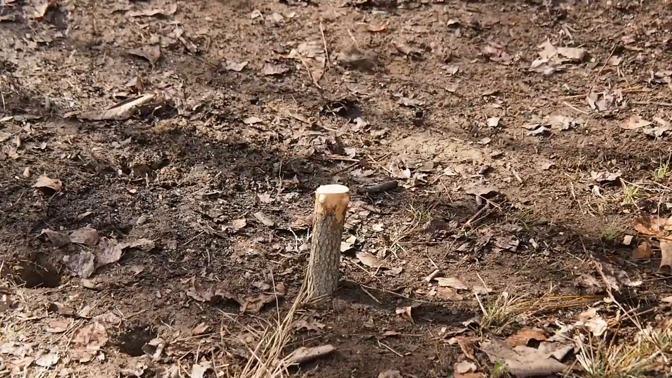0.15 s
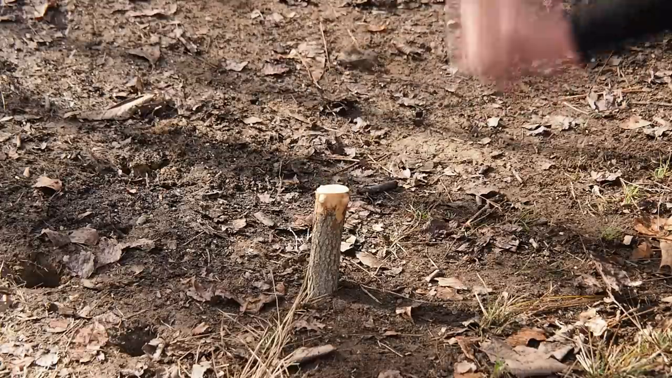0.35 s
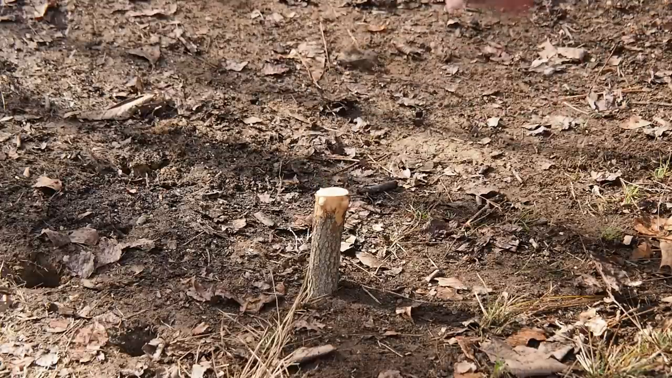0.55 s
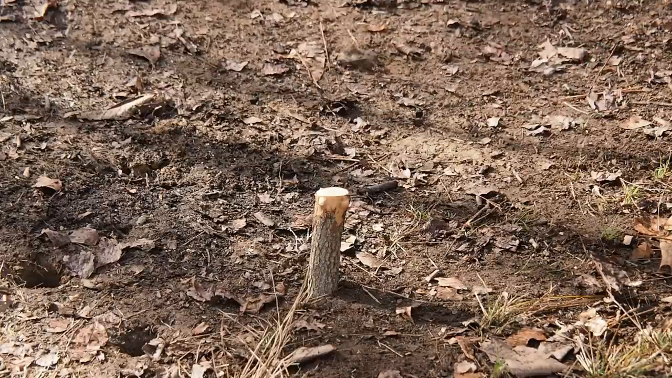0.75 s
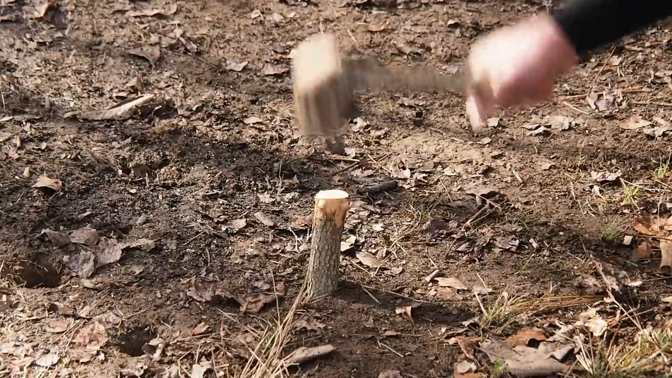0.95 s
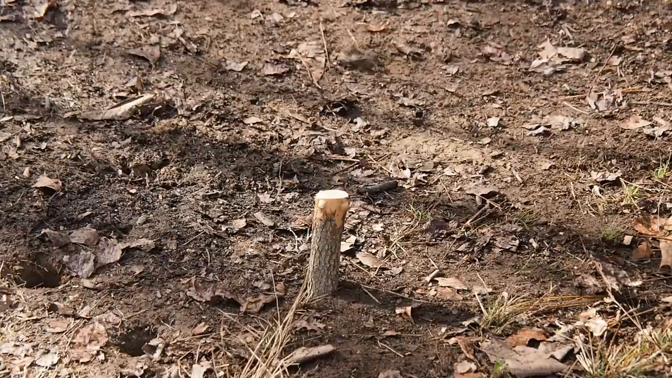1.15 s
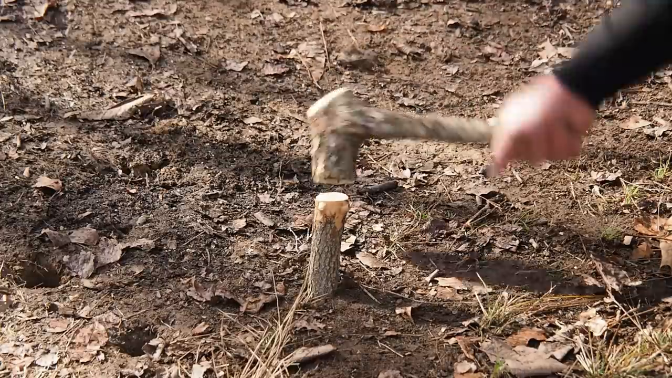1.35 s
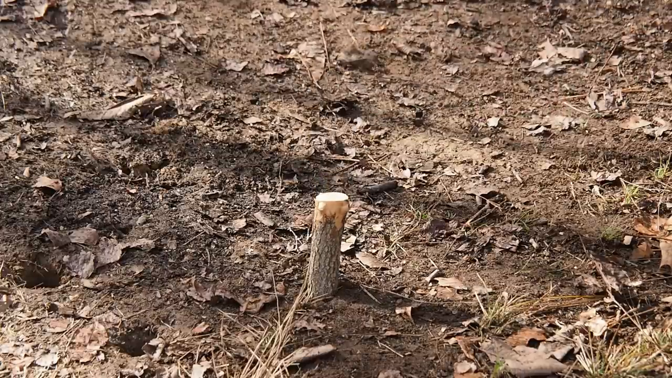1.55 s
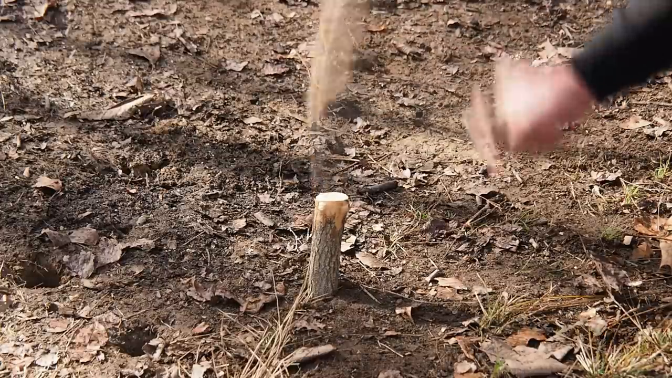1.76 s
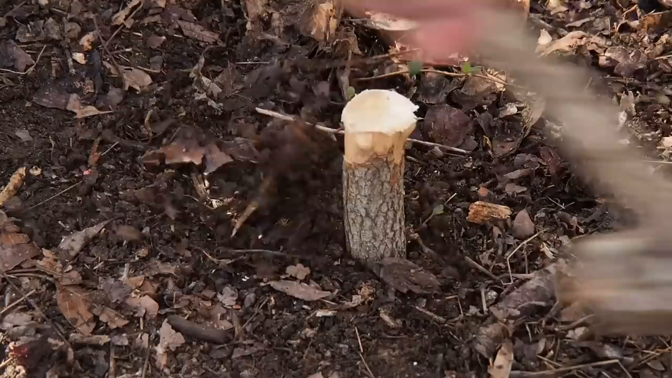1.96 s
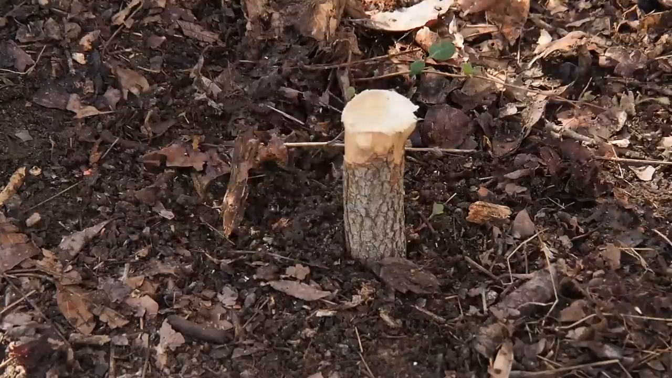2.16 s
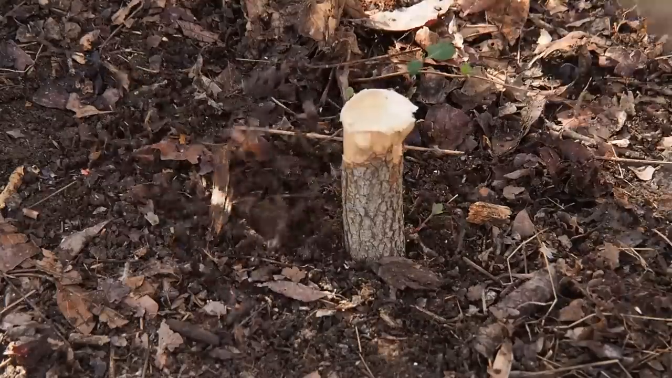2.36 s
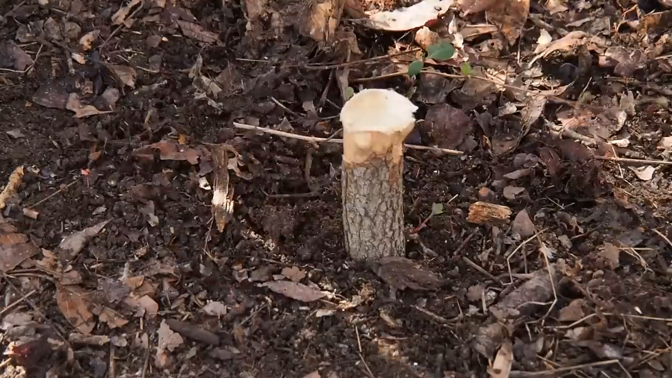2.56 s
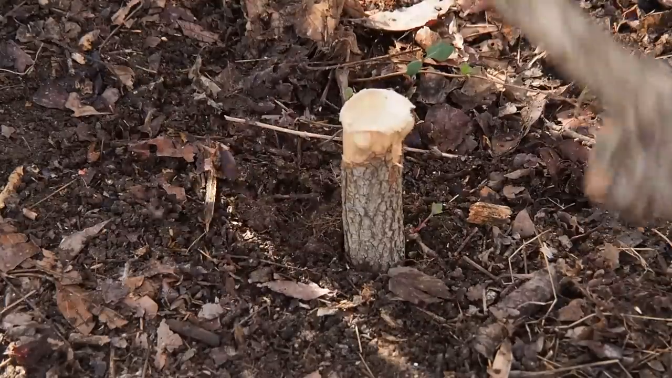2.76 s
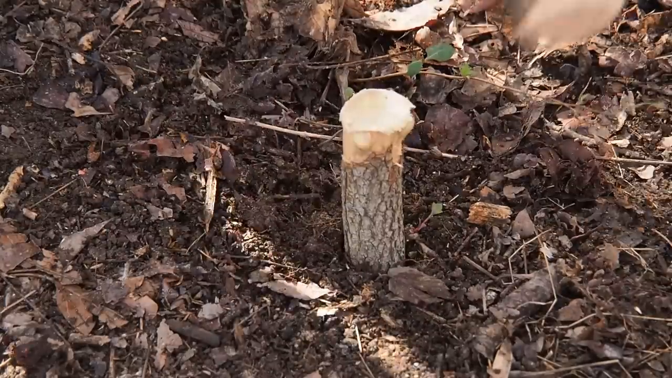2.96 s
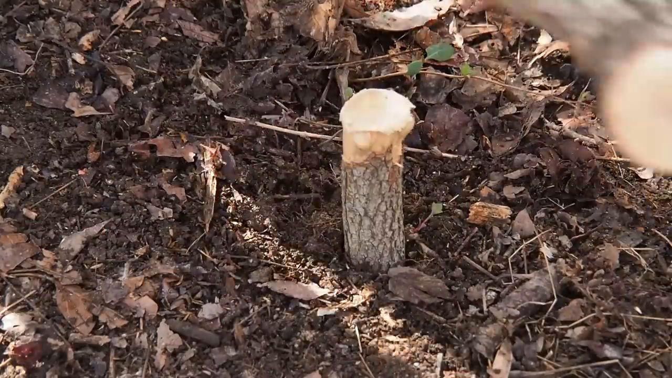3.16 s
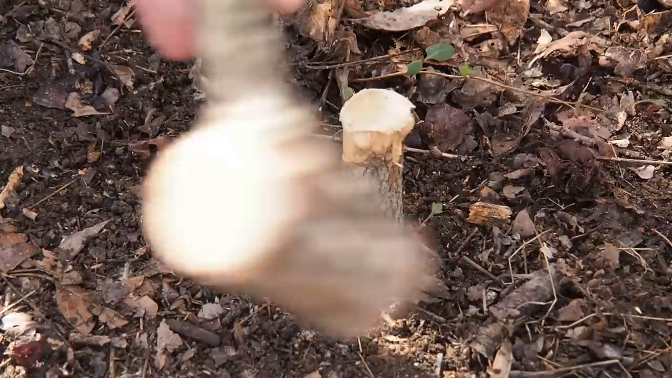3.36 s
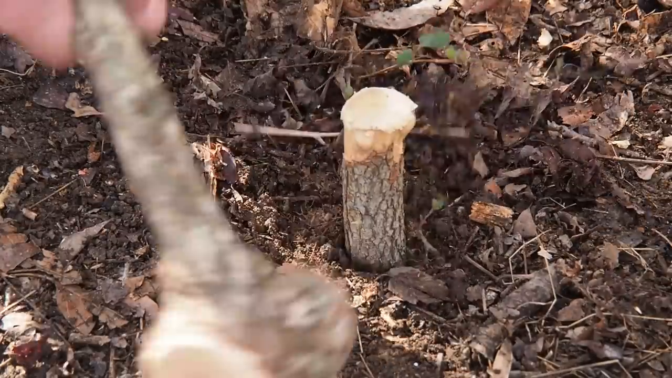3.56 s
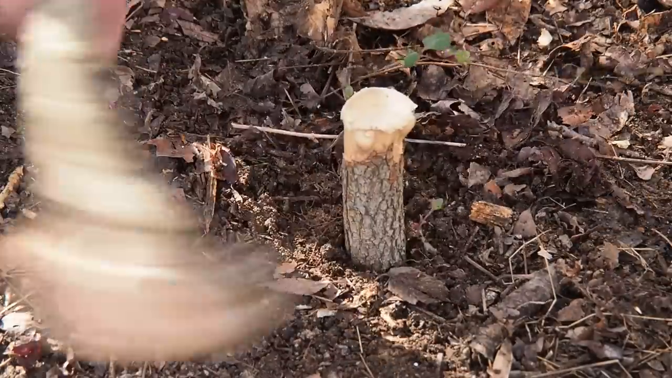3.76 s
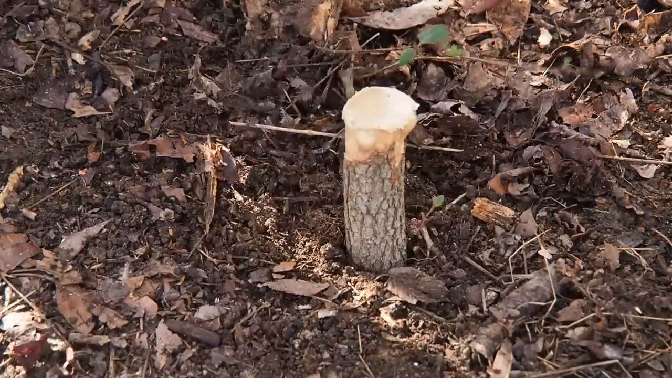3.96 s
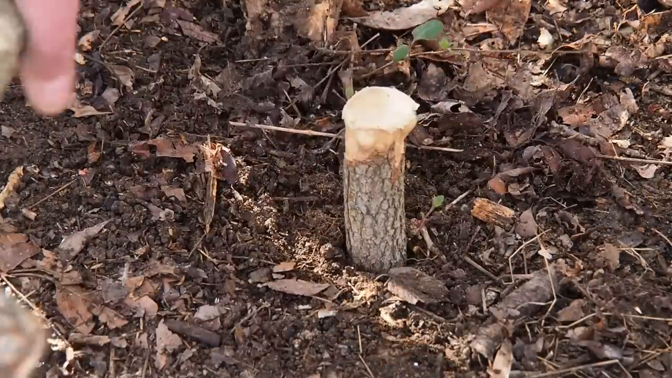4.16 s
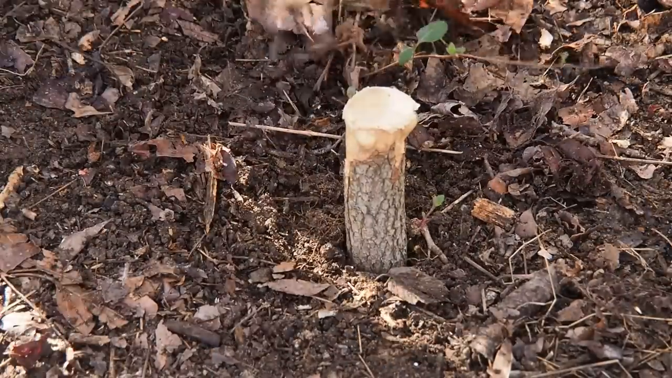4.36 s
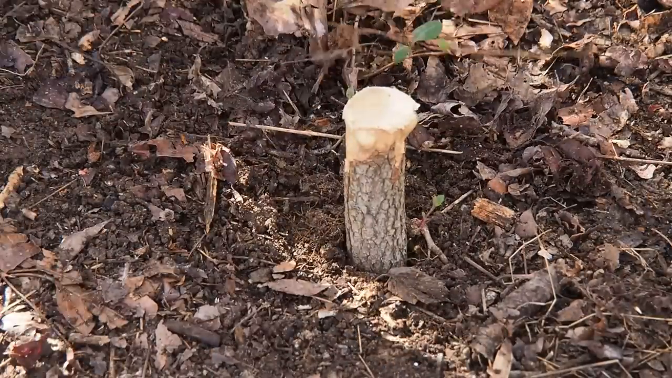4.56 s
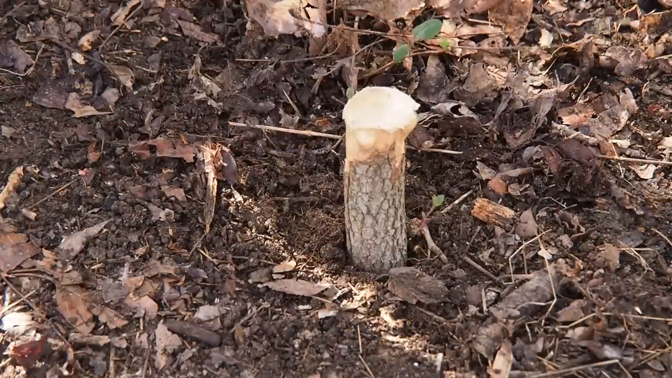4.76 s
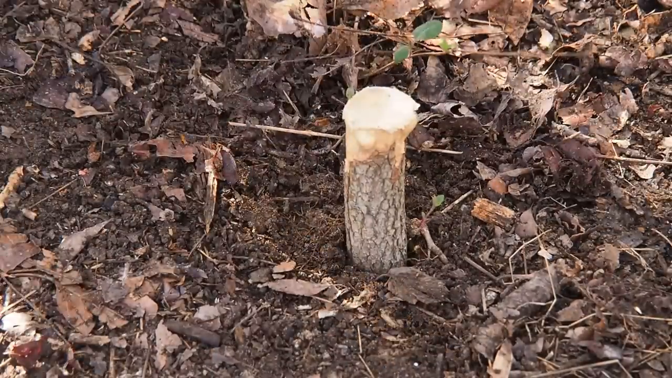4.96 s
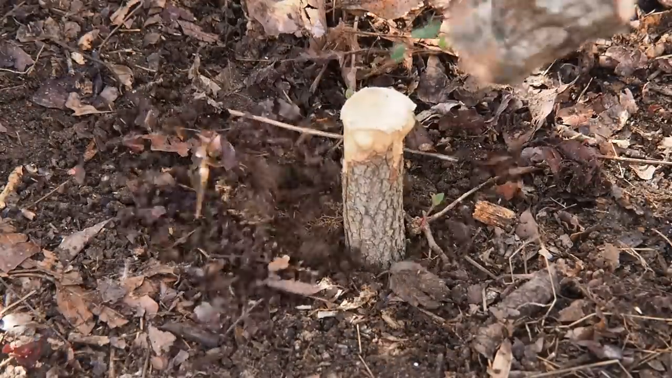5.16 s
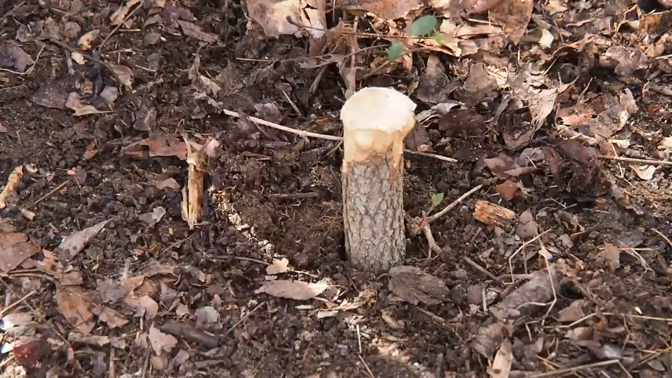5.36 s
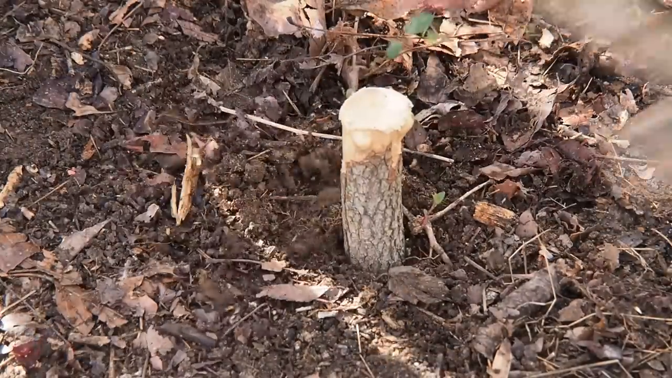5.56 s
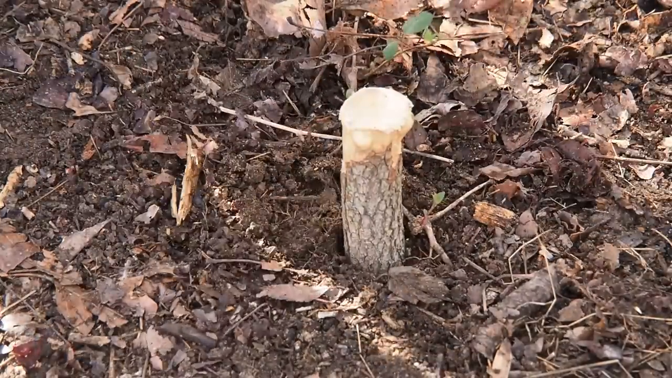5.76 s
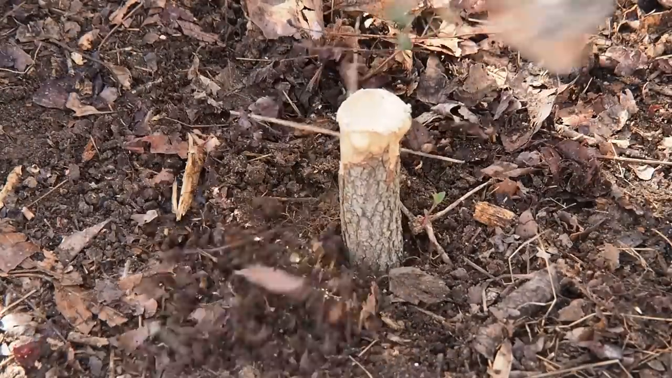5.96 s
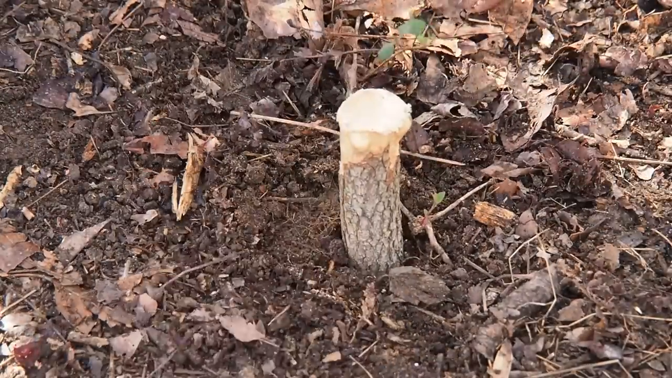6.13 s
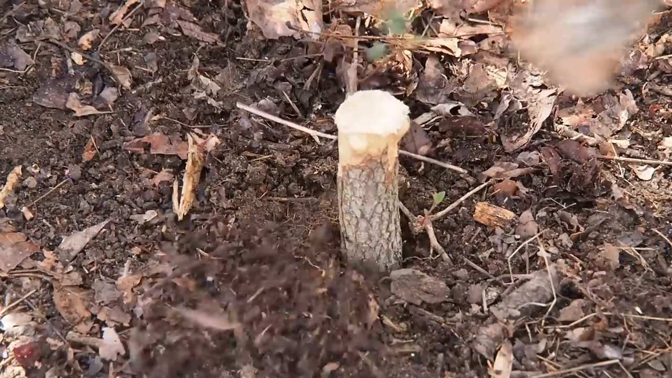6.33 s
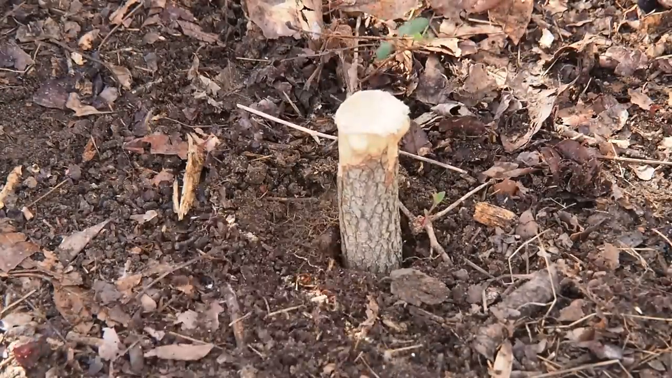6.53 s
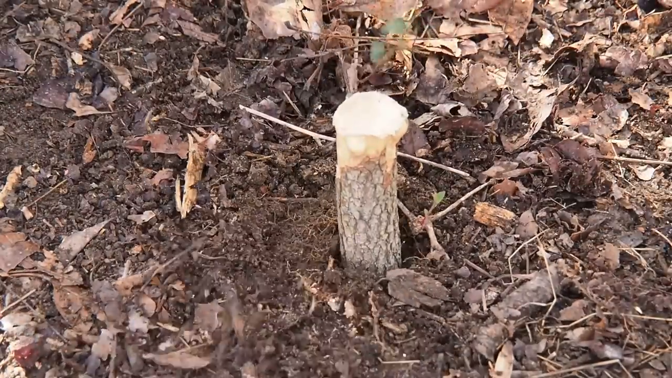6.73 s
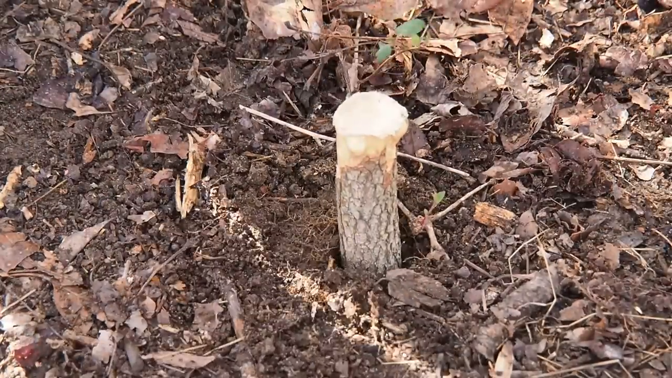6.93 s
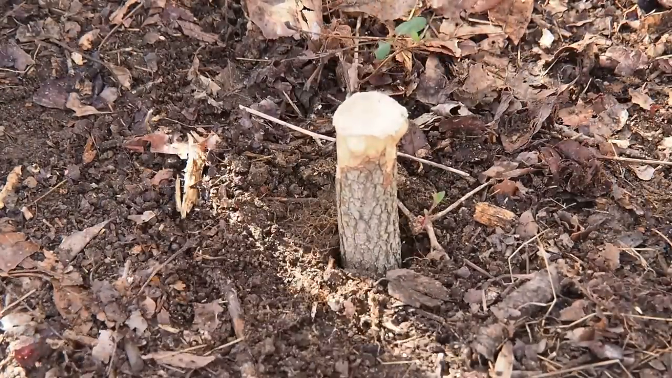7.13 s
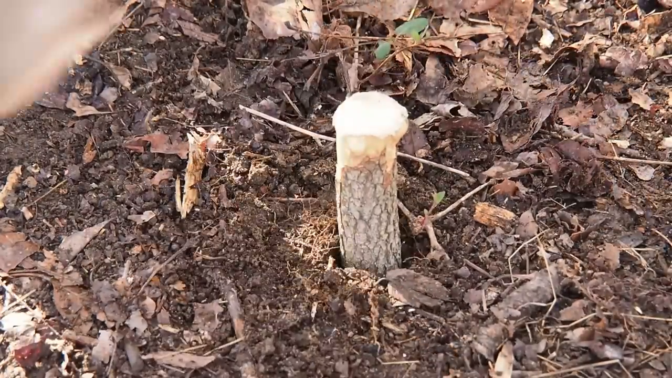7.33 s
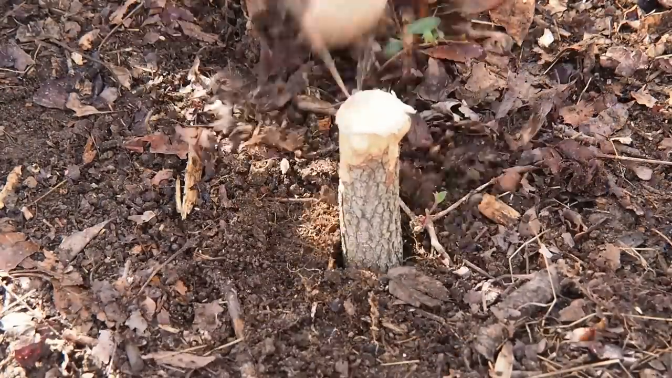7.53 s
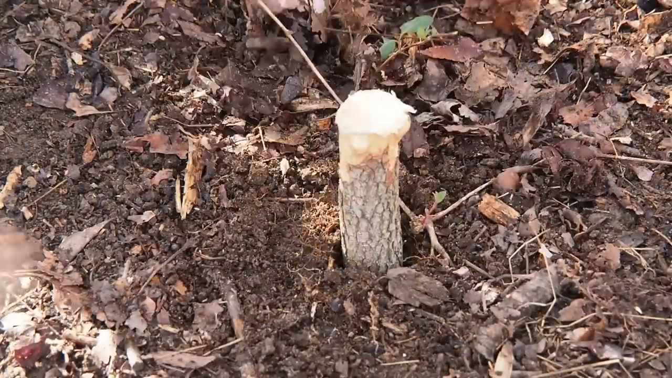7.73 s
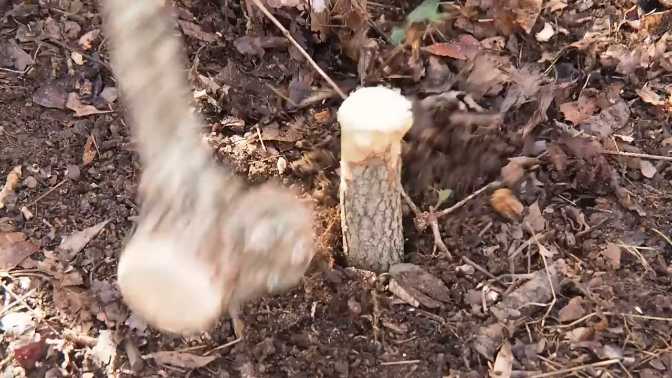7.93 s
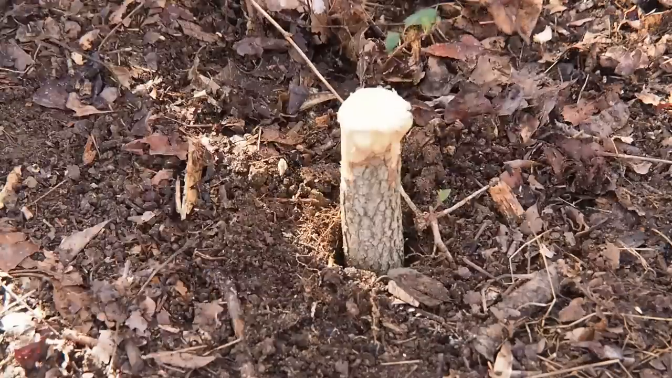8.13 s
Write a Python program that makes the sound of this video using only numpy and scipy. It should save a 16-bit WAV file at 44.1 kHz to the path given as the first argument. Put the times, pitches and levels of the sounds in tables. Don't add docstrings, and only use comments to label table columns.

```python
import sys
import numpy as np
from scipy import signal
from scipy.io import wavfile
from scipy.ndimage import uniform_filter1d

SR = 44100
rng = np.random.default_rng(int(sys.argv[2]) if len(sys.argv) > 2 else 0)


def ratio(d):
    e = np.asarray(d, float) / 20
    return 10 ** e


def dump(signal):
    limited = np.clip(np.atleast_2d(signal).T, -1, 1)
    pcm = np.round(limited * 32767).astype(np.int16)
    wavfile.write(sys.argv[1], SR, pcm)


N = 365588

LEAD = 4410
VIEW_CHANGE_S = 2.0022
SHAKE_LATE_S = .015


def evened(x):
    return x / np.sqrt(np.mean(x ** 2) + 1e-20)


def smoothed_twice(x, size):
    return uniform_filter1d(uniform_filter1d(x, size=size), size=size)


def read(points, hz, axis=1):
    table = np.transpose(points)
    return np.interp(np.log(hz + 1), np.log(table[0] + 1), table[axis])


def add(mix, s, sound):
    part = mix[LEAD + round(s * SR):][:len(sound)]
    part += sound[:len(part)]


def noise(size, level_db, order=8):
    frame, hop = 2 ** order, 2 ** (order - 2)
    hz = np.fft.rfftfreq(frame, 1 / SR)[:, None]
    s = np.arange(size // hop + 4) * hop / SR
    a, b = rng.standard_normal((len(s), len(hz), 2)).T
    spectra = (a + 1j * b) * ratio(level_db(hz, s))
    return signal.istft(spectra, nperseg=frame, noverlap=frame - hop)[1][:size]


# (time [s], hiss left by the gain control [dB], ground shake over hiss [dB])
AFTER_BLOW = [(0, -88, 27.5), (.43, -90.5, 27), (.88, -88, 26), (1.35, -88, 27), (1.81, -87.5, 25.5),
              (1.99, -66, 24), (2.299, -72.5, 28.5), (2.65, -73.5, 30.5), (3.48, -74.5, 27.5),
              (3.83, -80.5, 27.5), (4.281, -75.5, 23.5), (5.155, -80.5, 29.5), (5.51, -81, 28),
              (5.92, -78, 30), (6.295, -86, 29.5), (6.63, -86, 30), (7.5, -81.5, 26), (7.94, -83.5, 33)]
RECOVER_DB_PER_S, STEP_S = 7.5, .008


def gain_control():
    t = np.arange(N) / SR
    s, db, _ = np.transpose(AFTER_BLOW)
    s = np.where(abs(s - VIEW_CHANGE_S) < SHAKE_LATE_S, VIEW_CHANGE_S, s)
    last = np.searchsorted(s, t, "right") - 1
    hiss_db = db[last] + RECOVER_DB_PER_S * (t - s[last])
    return t, uniform_filter1d(hiss_db, size=round(STEP_S * SR))


# (frequency [Hz], level [dB per Hz])
HISS = [(150, 3), (1000, 3), (5000, -0.5), (10000, -0.5), (15500, 0.5), (15900, -23.5)]
# (frequency [Hz], level [dB per Hz])
RUSTLE = [(88, -35), (150, -5.5), (230, -3.5), (400, -7.5), (1300, -2), (4300, -6), (5500, -14),
          (11000, -46.5)]
# (frequency [Hz], level [dB per Hz])
RUMBLE = [(12, -30), (20, 1), (50, 1.2), (150, -11), (221, -8.5), (300, -12), (390, -44), (660, -120)]
# (centre [s], half length [s], rise [dB])
STIRS = [
    (2.92, 0.0316, 7),
    (3.35, 0.128, 1.5),
    (4.299, 0.0496, 7),
    (4.95, .2, 1.6),
    (6.2, .08, 3),
    (6.998, 0.0514, 5.5),
    (7.2, .08, 4),
    (7.601, .07, 8),
]
MIDDLE_DB = -75
LEAVES_DB, LEAVES_SHARE, FAR_LEAVES_DB = 8, 0.978, -2
RUMBLE_DB, RUMBLE_SHARE, FAR_RUMBLE_DB = 5, 0.7, -12


def air():
    t, hiss_db = gain_control()
    far = t < VIEW_CHANGE_S
    gain_db = hiss_db - MIDDLE_DB
    stirred_db = sum(db * np.exp(-((t - s) / half) ** 2) for s, half, db in STIRS)
    rustle_db = MIDDLE_DB + LEAVES_DB + LEAVES_SHARE * gain_db + FAR_LEAVES_DB * far + stirred_db
    rumble_db = MIDDLE_DB + RUMBLE_DB + RUMBLE_SHARE * gain_db + FAR_RUMBLE_DB * far

    def patchy(hz, s):
        grain = uniform_filter1d(rng.standard_normal((len(hz), len(s))), size=5, axis=0)
        return read(RUSTLE, hz) + 1.9 * evened(uniform_filter1d(grain, size=20, axis=1))

    hiss = evened(noise(N, lambda hz, s: read(HISS, hz) + 0 * s)) * ratio(hiss_db + 4.5)
    rustle = evened(noise(N, patchy)) * ratio(rustle_db - 1.0)
    rumble = evened(noise(N, lambda hz, s: read(RUMBLE, hz) + 0 * s, order=12)) * ratio(rumble_db - 0.5)
    return hiss + rustle + rumble


# (centre [s], half length [s], level [dB], pitch [Hz], rise [Hz/s])
SWISHES = [
    (4.86, .08, -67.5, 1050, -300),
    (7.03, 0.059, -74.5, 800, 9001),
    (7.03, 0.039, -69, 900, 11000.5),
    (3.8, 0.027, -63, 1200, 103),
]


def swishes():
    out = np.zeros(N + LEAD)
    t = np.arange(-.2, .2, 1 / SR)
    for s, half, db, hz, rise in SWISHES:
        a, b = smoothed_twice(rng.standard_normal((2, len(t))), 110)
        carrier = np.exp(2j * np.pi * (hz + rise * t / 2) * t)
        band = ((evened(a) + 1j * evened(b)) * carrier).real
        add(out, s + t[0], ratio(db) * band * np.exp(-(t / half) ** 2))
    return out[LEAD:]


# (time [s], peak level [dB], frequency [Hz], length [ms])
TICKS = [(.1, -57.5, 3710, 3.9), (.55, -64.5, 3570, 4.3), (.925, -45, 600, 3.6), (1.003, -59.5, 3638, 3.6),
         (2.386, -45, 8200, 1.57), (2.92, -51.5, 2500, 7), (3.398, -45.5, 2200, 5.0),
         (4.3339, -37, 1600, 1.94), (4.34, -45, 3500, 1.8), (4.284, -36, 2970, 11.3),
         (4.3345, -39.5, 4040, 1.44), (4.284, -45, 8600, 9.9), (4.391, -50, 1800, 2.06),
         (4.75, -59.5, 2170, 2.28), (4.93, -52.5, 519, 5.8), (5.014, -49.5, 4003, 1.96),
         (5.9104, -39.5, 3000, 1.2), (5.64, -56.5, 3952, 1.91), (6.357, -48.5, 999, 1.8),
         (6.873, -52, 1746, 2.0), (6.901, -58, 3500, 0.54), (6.874, -59, 4200, 1.5),
         (6.9, -62.5, 5016, 1.16), (7.38, -62.5, 413, 3.9), (7.46, -63, 611, 2.3),
         (7.592, -50.5, 3300, 3.12), (7.69, -60, 4400, 2.7), (7.731, -57.5, 3800, 1.8),
         (7.89, -57.5, 3000, 0.97)]


def ticks():
    out, t = np.zeros(N + LEAD), np.arange(SR // 20) / SR
    for s, db, hz, ms in TICKS:
        grit = rng.standard_normal(len(t)) * np.exp(-t * 1000 / ms)
        snap = signal.lfilter(*signal.butter(2, [.7 * hz, 1.45 * hz], "band", fs=SR), grit)
        add(out, s, ratio(db) * snap / abs(snap).max())
    return out[LEAD:]


FAR_SHAKE_HZ, FAR_SHAKE_T60_S = 62.8, .7
SHAKE_HZ, SHAKE_T60_S = 99, .8
SINK_HZ_PER_S, SAG_HZ_PER_S = 3.5, 60


def soil():
    out, t = np.zeros(N + LEAD), np.arange(SR) / SR
    for s, hiss_db, over_db in AFTER_BLOW:
        if s < VIEW_CHANGE_S - SHAKE_LATE_S:
            hz, t60 = FAR_SHAKE_HZ, FAR_SHAKE_T60_S
        else:
            start_hz = SHAKE_HZ - SINK_HZ_PER_S * (s - VIEW_CHANGE_S)
            sag_hz = SAG_HZ_PER_S * (s > VIEW_CHANGE_S - SHAKE_LATE_S) * t * (1 - t / 2) / 2
            hz, t60 = start_hz - sag_hz, SHAKE_T60_S
        a, b = smoothed_twice(rng.standard_normal((2, SR)), 750)
        swing = .8 + .45 * (evened(a) + 1j * evened(b))
        shake = ratio(hiss_db + over_db - 60 * t / t60) * (swing * np.exp(2j * np.pi * hz * t)).imag
        add(out, s + SHAKE_LATE_S, shake * np.clip(t / 0.0027, 0, 1))
    return out[LEAD:]


# (frequency [Hz], level [dB], t60 [s])
FAR_TREES = [(60, -36, .4), (140, -11, .5), (348, -25.5, 0.8), (750, -5.5, 1.05), (1300, -3.5, 1.1),
             (2200, -3.5, .75), (4500, -13.5, .45), (9000, -31, .3)]
# (frequency [Hz], level [dB], t60 [s])
NEAR_TREES = [(60, -20, .4), (150, 1.5, 0.18), (450, -1, .4), (800, -5, 0.46), (1158, -.6, .7),
              (1900, -10.5, 0.52), (3500, -17.5, .4), (6500, -33, .2)]
FAR_WOOD = dict(trees=FAR_TREES, scatter_db=-54.5, share=0.11, tail_db=-70)
NEAR_WOOD = dict(trees=NEAR_TREES, scatter_db=-53, share=0.18, tail_db=-71)


def returns(trees, scatter_db, share, tail_db):
    t = np.arange(SR) / SR

    def fading(db, share):
        return noise(SR, lambda hz, s: read(trees, hz) + db - 60 * s / (share * read(trees, hz, axis=2)))

    clumps = ratio(1.9 * evened(uniform_filter1d(rng.standard_normal(SR), size=300)))
    onset = np.clip(t / 0.00067 - 1, 0, 1)
    return (fading(scatter_db, share) + fading(tail_db, 0.952)) * clumps * onset


# (delay [ms], level [dB], sign)
FAR_ECHOES = [(1.7432, -15, 1), (4.1513, -24, -1), (8.53, -20.5, -1), (26.1, -34.5, 0.871),
              (37.46, -40, -1)]
# (delay [ms], level [dB], sign)
NEAR_ECHOES = [(2.6, -20.5, -1), (5.0, -18.5, 0.92), (13, -38.5, 1)]


def echoed(sound, echoes):
    taps = np.zeros(SR // 20)
    for ms, db, sign in echoes:
        taps[round(ms * SR / 1000)] += np.sign(sign) * ratio(db)
    taps = signal.lfilter(*signal.butter(1, 3500, fs=SR), taps)
    taps[0] = 1
    return np.convolve(sound, taps)


def modes(table, t, scale=1, start=0):
    hz, db, ms = np.transpose(table)[..., None]
    contact = t * 1000 / ms
    swell = contact * np.exp(.5 - .5 * contact ** 2)
    return (ratio(db) * swell * np.sin(2 * np.pi * (hz * scale * t + start))).sum(0)


# (frequency [Hz], level [dB], swell time [ms])
THUD = [(264.6, -4, 2.7), (412.8, 3.5, 1.647), (625.7, -0.5, 1.9)]
# (multiple of the blow's ring [1], level [dB], swell time [ms])
RING = [(1.0, 2, 1.4), (.73, -2, 1.3), (1.36, -4.5, 1.3)]
# (frequency [Hz], level [dB], swell time [ms])
UPPER = [(2001.6, 1, 0.8855), (2500, -2.5, 1), (3081, -3, 0.69), (3800, -5, 0.71), (4587, -12, 0.53)]
CRACK_SHARE = 0.53
JOLT_DB, JOLT_S = -34.5, .005


def knock(db, hz, thud_db, upper_db, crack_db):
    t = np.arange(SR // 20) / SR
    grit = signal.lfilter(*signal.butter(2, [4500, 12500], "band", fs=SR), rng.standard_normal(len(t)))
    crack = evened(grit) * np.exp(-t / 0.00084) * np.clip(t / 0.00013, 0, 1)
    crack = ratio(crack_db + CRACK_SHARE * upper_db) * crack
    thud_detune, upper_detune = rng.uniform(.94, 1.06, 2)
    thud = -ratio(thud_db - 7.5) * modes(THUD, t, thud_detune)
    thud = signal.lfilter(*signal.butter(2, 125, "high", fs=SR), thud)
    jolt = ratio(JOLT_DB) * np.sin(np.pi * np.minimum(t / JOLT_S, 1)) ** 2
    spot = rng.random((len(UPPER), 1))
    upper = ratio(upper_db - 2.5) * modes(UPPER, t, upper_detune, spot)
    ring = modes(RING, t, hz)
    return ratio(db - 1.2031) * (ring + thud + upper + jolt + crack)


# (time [s], ring [dB], ring [Hz], thud over ring [dB], upper ring over ring [dB])
FAR = [
    (0.4201, -5.5, 1035, -10, 1.5),
    (0.8739, -5, 1179, -9, 0.73),
    (1.3429, -3.5, 1302, -8, -1.2),
    (1.8004, -2, 1304, -13, .6),
]
# (time [s], ring [dB], ring [Hz], thud over ring [dB], upper over ring [dB])
NEAR = [(2.2906, -1, 850, -0.52, -6), (2.2992, -16.5, 1400, -0.7, 11.3), (2.6467, -3, 885.8, 1.8, -4.5),
        (3.4759, 0.5033, 1060, -7, -6), (3.8222, 0.24, 1043, -9, -14.5), (4.2698, -13.5, 828.8, -1.5, -1.5),
        (4.2775, -14, 1033, -2.5, -11.5), (5.1465, -0.92, 1025, -3, -2.5), (5.5057, -1.5, 1011, -2.5, -15),
        (5.9166, -4, 1295, 3.5, -9), (6.2868, -0.5, 1404, -7.5, -5), (6.6262, -1.5952, 1210, -8.5, -16),
        (7.496, -4.5, 1277, -1.5, -12.5), (7.9305, -4.5, 1164, -0.87, -1.24)]
FAR_BEFORE = (-.035, -3, 1100, -7, -2)
NEAR_BEFORE = (1.9724, -0.5, 999, -5.5, -6)
FAR_CRACK_DB, NEAR_CRACK_DB = -23.5, -20.5
BOUNCE_S, BOUNCE_DB = .02, -10


def blows(table, echoes, wood, crack_db):
    out, before = np.zeros(N + LEAD), -1
    for s, *colour in table:
        direct = knock(*colour, crack_db)
        add(out, s, echoed(direct, echoes))
        bounce = s - before < BOUNCE_S
        add(out, s, np.linalg.norm(direct) * ratio(BOUNCE_DB * bounce) * returns(**wood))
        before = s
    return out[LEAD:]


def scene():
    far = blows([FAR_BEFORE, *FAR], FAR_ECHOES, FAR_WOOD, FAR_CRACK_DB)
    near = blows([NEAR_BEFORE, *NEAR], NEAR_ECHOES, NEAR_WOOD, NEAR_CRACK_DB)
    knocks = np.where(np.arange(N) < VIEW_CHANGE_S * SR, far, near)
    return (knocks + soil() + ticks() + swishes() + air())[None]


def band_limit(x):
    return signal.sosfilt(signal.butter(12, 16820, fs=SR, output="sos"), x)


def record(dry):
    clipped = np.clip(dry, -1, 1)
    limited = signal.lfilter(*signal.butter(8, 15900, fs=SR), clipped)
    return band_limit(limited)


dry = scene()
out = record(dry)
dump(out)
```